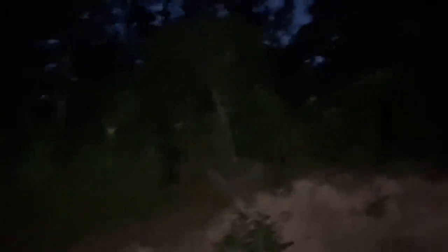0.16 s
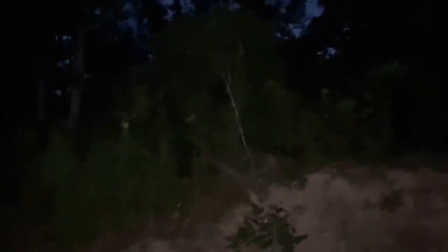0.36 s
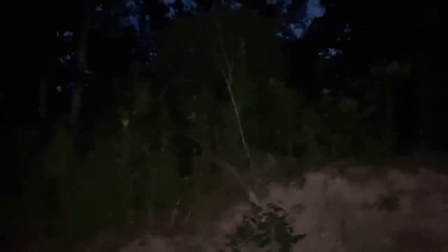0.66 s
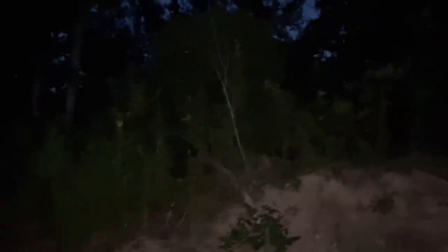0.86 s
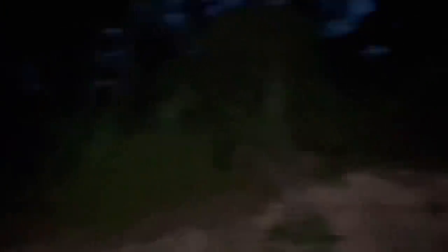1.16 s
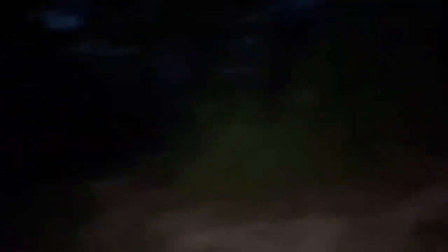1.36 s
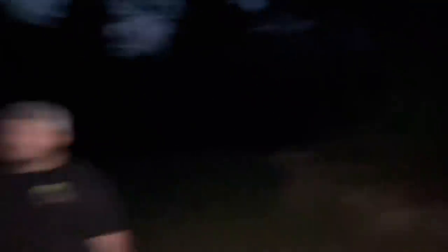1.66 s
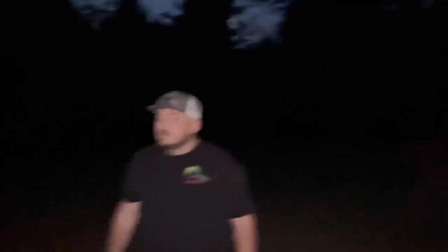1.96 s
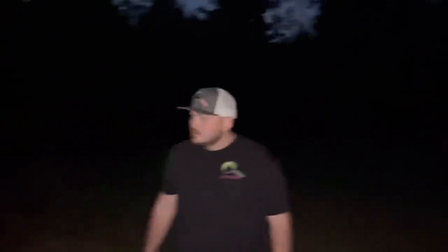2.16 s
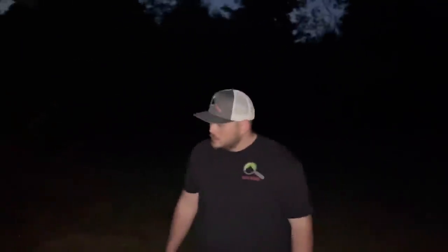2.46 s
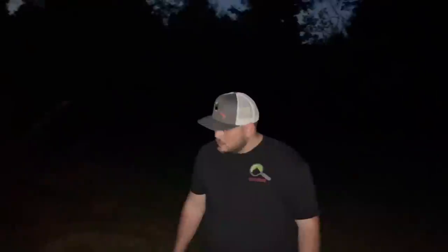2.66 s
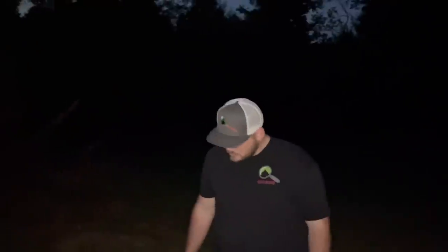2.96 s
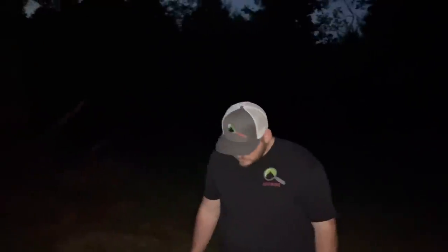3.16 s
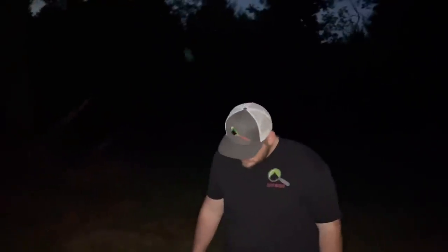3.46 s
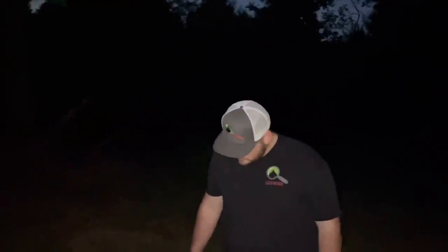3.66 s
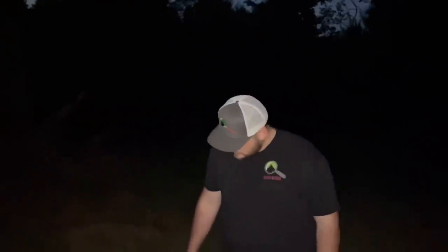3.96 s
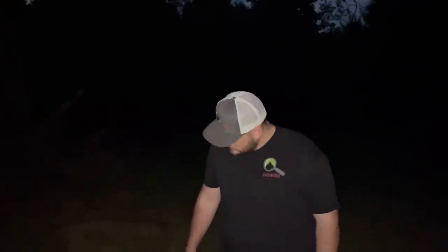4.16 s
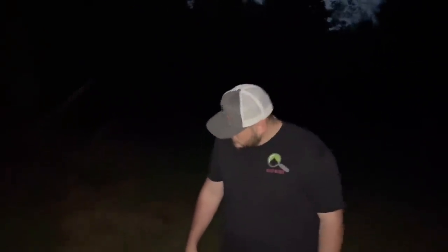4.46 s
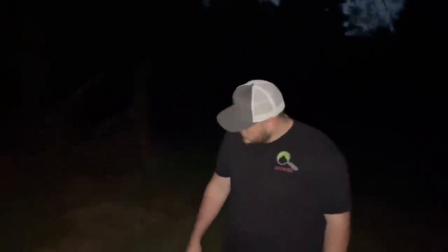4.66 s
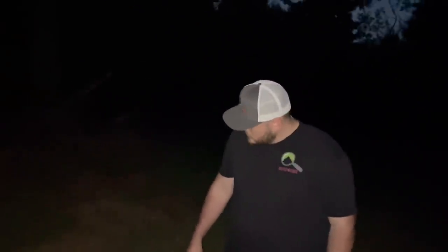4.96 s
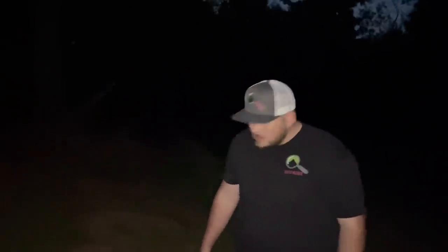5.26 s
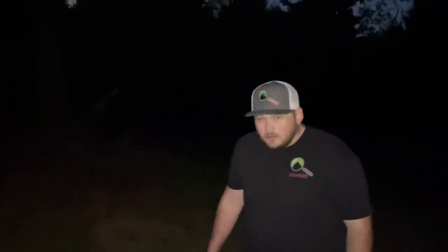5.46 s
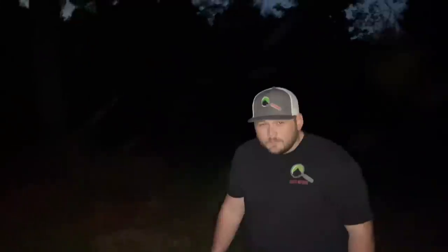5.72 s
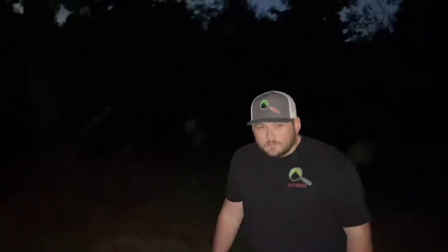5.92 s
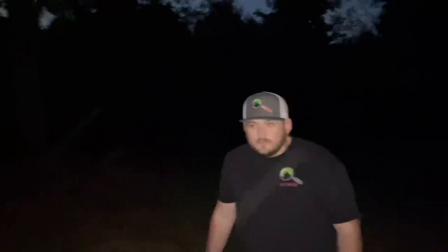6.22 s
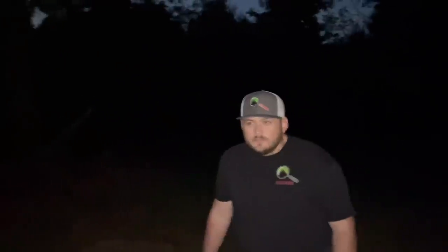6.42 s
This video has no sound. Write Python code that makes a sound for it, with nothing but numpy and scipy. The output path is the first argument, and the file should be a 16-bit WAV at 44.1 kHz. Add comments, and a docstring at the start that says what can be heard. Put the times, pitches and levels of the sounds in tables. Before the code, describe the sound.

A very high, close katydid buzz runs unbroken over cricket trills, chirps and a faint low rumble, with one clear twig tick near two seconds.

```python
"""Night at the edge of a wood. All through, a katydid buzzes very high and close by: two falling scrapes per wing stroke.
Steady crickets, blurred cricket choirs, a far rasp of filtered noise and a low noise rumble lie under it.
Leaves rustle and twigs tick faintly at the start; within half a second nearer crickets begin to trill, then chirp.
Around 1.5 s a dip climbs through the pitches of the buzz and its tone changes; just before 1.9 s a twig ticks clearly.
Trills and chirps go on to the end, with a few fainter ticks (short falling tones) and rustles (bursts of noise)."""
import sys
import numpy as np
from scipy import signal
from scipy.fft import rfft, irfft, next_fast_len
from scipy.io import wavfile
from scipy.ndimage import uniform_filter1d

SR = 44100
rng = np.random.default_rng(int(sys.argv[2]) if len(sys.argv) > 2 else 0)


def dump(signal):
    """Clip the signal to [-1, 1] and save it as 16-bit WAV at the path in sys.argv[1]."""
    limited = np.clip(np.atleast_2d(signal).T, -1, 1)
    pcm = np.round(limited * 32767).astype(np.int16)
    wavfile.write(sys.argv[1], SR, pcm)


N = 290619
T = np.arange(N) / SR  # time of every sample, in seconds


def undb(db):
    """Turn decibels into a gain."""
    return 10 ** (np.asarray(db) / 20)


def unit(x):
    """Scale to an average strength (rms) of 1."""
    return x / np.sqrt(np.mean(x ** 2) + 1e-20)


def steady(x, size=4410):
    """Hold the rms near 1 over every tenth of a second."""
    return x / np.sqrt(np.maximum(uniform_filter1d(x ** 2, size), 1e-12))


def curve(rows):
    """Join (time [s], value) rows by straight lines."""
    return np.interp(T, *np.transpose(rows))


def bout(start, length, attack_s, release_s):
    """A loudness outline that rises, holds and falls within its length."""
    rise = (T - start) / attack_s
    fall = (start + length - T) / release_s
    return np.clip(np.minimum(rise, fall), 0, 1)


def walk(rate):
    """A random curve with a spread near 1, heading for a new value `rate` times a second."""
    steps = rng.standard_normal(2048)
    return np.interp(T * rate, np.arange(len(steps)), steps)


def pan(db):
    """Left and right gains for a level difference; positive is louder on the left."""
    return undb(np.array([[db], [-db]]) / 2)


def colour(x, points):
    """Shape the tone by a (frequency [Hz], level [dB]) spectrum; rms 1."""
    hz, db = np.transpose(points)
    size = next_fast_len(N + 4096)
    f = np.maximum(np.fft.rfftfreq(size, 1 / SR), 1)
    gain = undb(np.interp(np.log(f), np.log(hz), db, left=-90, right=-90))
    return unit(irfft(rfft(x, size) * gain, size)[..., :N])


def band(x, hz, width_hz):
    """Keep a soft-edged band of pitches around hz; rms 1."""
    edges = np.clip([hz - width_hz / 2, hz + width_hz / 2], 20, SR / 2 - 100)
    band_filter = signal.butter(2, edges, "band", fs=SR, output="sos")
    return unit(signal.sosfilt(band_filter, x))


def stereo_noise(side_db):
    """Noise shared by both ears plus a part that is opposite in the two."""
    mid, side = rng.standard_normal((2, N))
    return mid + undb(side_db) * side * np.array([[1], [-1]])


def scatter(x, t60, channels=2, count=5):
    """Countless small echoes from leaves and trunks, fading 60 dB in t60 s, through `count` patterns in turn; rms 1."""
    t = T[:SR // 2]
    out = 0
    for k in range(count):
        echoes = rng.standard_normal((channels, len(t))) * undb(-60 * t / t60)
        distance = np.abs(T / T[-1] * (count - 1) - k)
        share = np.cos(np.pi / 2 * np.minimum(distance, 1))  # fade from one pattern to the next
        out = out + share * signal.fftconvolve(np.atleast_2d(x), echoes, axes=1)[:, :N]
    return unit(out)


def background(flutter_db=1.7):
    """Low rumble, nearly alike in both ears, brighter and wider as it swells, and the soft hush of the wood."""
    # distant rumble: (time [s], level [dB])
    rumble_level = [(0, -58), (.15, -59), (.4, -61), (.8, -58), (1.21, -62), (1.3, -57), (2.04, -63),
                    (2.24, -56), (2.6, -62), (2.84, -57), (3.3, -61.5), (4.15, -62), (4.6, -58.5),
                    (5, -59.5), (5.6, -59.5), (5.78, -65), (6.28, -57.5), (6.59, -59)]
    # tone of the rumble, of its upper part and of the hush: (frequency [Hz], level [dB])
    rumble_colour = [(18, -21), (27, -28), (36, -9.5), (50, -5.5), (70, -1), (97, 1.5), (125, -3.5),
                     (170, -12.5), (260, -43.5), (400, -44)]
    surge_colour = [(110, -18), (170, -0.5), (228, 0.5), (280, -6.5), (400, -12), (600, -23), (900, -56)]
    air_colour = [(250, -3.5), (500, 3.5), (800, 0), (1100, -0.5), (1700, -0.5), (2700, 7), (3200, -9),
                  (5500, -4.5), (6500, -35), (7300, -100), (10000, -44)]
    # hush of the wood: (time [s], level [dB])
    hush_level = [(0, -70), (1.1, -72.5), (2.4, -70.5), (3.7, -71), (5.3, -69.5), (6.59, -69)]
    surge_db, surge_swing = -70, 1.57  # middle level [dB]; dB gained for each dB of rumble

    level_db = curve(rumble_level)
    rumble = colour(stereo_noise(-13.5), rumble_colour) * undb(level_db) * pan(2.6)
    surge_level_db = surge_db + surge_swing * (level_db - level_db.mean())
    surge = colour(stereo_noise(-9.0), surge_colour) * undb(surge_level_db) * pan(2.1)
    air_db = curve(hush_level) + flutter_db * walk(22)
    air = colour(stereo_noise(-0.47), air_colour) * undb(air_db) * pan(3.3)
    return rumble + surge + air


def cricket(hz, rate, duty=.6, droop=.035, wander=.004, uneven=.025, flicker_db=2.0, start=None, arch=0, stroke_db=0):
    """A nearly pure wing tone on each closing stroke, arching and sagging in pitch; a stroke begins at start."""
    turns = np.cumsum(rate * (1 + uneven * walk(6))) / SR  # wing strokes so far
    turns = turns - (rng.random() if start is None else np.interp(start, T, turns))
    u = np.minimum(turns % 1 / duty, 1)  # progress through the sounding part
    stroke_number = np.floor(turns).astype(int) % 1024
    force_db = stroke_db * rng.standard_normal(1024)[stroke_number]  # strokes differ in strength
    pitch = hz * (1 + droop * (.5 - u) + arch * (1 / 8 - (2 * u - 1) ** 2) + wander * walk(45))
    loudness = np.sin(np.pi * u) * undb(force_db + flicker_db * walk(12))
    return unit(loudness * np.sin(2 * np.pi * np.cumsum(pitch) / SR))


def droners(pan_db=2):
    """A few far crickets sing without a break: wing tones repeated at a nearly even pace."""
    # (tone [Hz], pace [strokes/s], sounding share of each stroke [0-1], pitch wander [share], level [dB])
    singers = [(2195, 56.4, .35, .0004, -78.5), (2499, 38.4, .55, .007, -74), (5614, 30, .65, .004, -76),
               (6335, 13.5, .4, .008, -80.5)]
    voices = 0
    for hz, rate, duty, wander, db in singers:
        voice = cricket(hz, rate, duty, droop=0, wander=wander, uneven=0.0072)
        voices = voices + undb(db) * voice
    return voices * pan(pan_db)


def choirs(count=4, blur_width=1.48, side_db=-2, swell_db=1.5):
    """In each choir a few crickets stand out, apart in pitch and pace; the many behind them blur into one band."""
    # (middle tone [Hz], spread [Hz], middle pace [pulses/s], level [dB], left minus right [dB])
    groups = [(1936, 120, 48, -76, 1), (2253, 80, 44, -73.5, 3), (2457, 125, 44, -65.5, 2),
              (2764, 90, 38, -77, 3), (4232, 180, 36, -60, 5), (4840, 45, 49, -75.5, 2),
              (5250, 160, 46, -60.5, 7.5), (5910, 130, 36, -73.5, 2), (6300, 120, 12, -76.5, -4.5)]
    out = 0
    for hz, spread_hz, rate, db, pan_db in groups:
        voices = 0
        for place in np.linspace(-1, 1, count):
            voice = cricket(hz + place * spread_hz, rate * (1 + .2 * place),
                            duty=.55, droop=.03, wander=.01, uneven=.06, stroke_db=1.5)
            lag = int(round(place * SR / hz / 4))  # those off to one side reach one ear first
            voices = voices + undb(-4 * place ** 2) * np.array([voice, np.roll(voice, lag)])
        blur = band(stereo_noise(side_db), hz, blur_width * spread_hz)
        level = undb(db + swell_db * walk(5))
        out = out + unit(unit(voices) + blur) * level * pan(pan_db)
    return out


def far_insects(flutter_db=2):
    """A far insect rasps in bouts; distance blurs the rasp into a fluttering, wide hiss."""
    # (start [s], length to the middle of the fade-out [s], level [dB])
    rasps = [(-.02, 0.46, -74.5), (0.436, 0.59, -69.5), (1.1, 0.99, -76), (2.38, 0.48, -70),
             (3.995, 0.33, -71), (4.34, 0.54, -72), (4.978, 0.23, -77), (5.61, 0.52, -72),
             (6.222, 0.58, -75)]
    attack_s, release_s = 0.066, 0.33
    rest_db = -82.5  # others, further off, go on between the bouts
    rasps_per_s, swing_db = 6.6, 2.5

    bouts = undb(rest_db)
    for start, length, db in rasps:
        # each bout is a few separate rasps
        beats_db = -swing_db * np.cos(2 * np.pi * rasps_per_s * (T - start))
        bouts = bouts + undb(db + beats_db) * bout(start, length + release_s / 2, attack_s, release_s)
    hiss = band(stereo_noise(-0.37), 3270, 1100)
    return hiss * bouts * undb(flutter_db * walk(60)) * pan(0.85)


def trills(pan_db=6):
    """Nearer crickets to the left sing fast trills and slower chirps; echoes run their uneven pulses together."""
    # fast trills: (start [s], length [s], tone [Hz], level [dB], pitch wander [share])
    trill_table = [(0.47, 0.395, 4300, -59, .003), (1.0, .32, 4800, -74, .01),
                   (1.235, 0.39, 4290, -58.7, .004), (1.24, 0.33, 4440, -66.5, .006),
                   (1.78, 0.33, 4440, -66, .007), (2.056, 0.28, 4530, -64.5, .005),
                   (2.4, 0.28, 4590, -69, .007), (2.42, .3, 4800, -75, .01), (2.68, .33, 4440, -68, .009),
                   (3.62, 0.38, 4295, -61, .004), (3.64, .25, 4800, -73, .01), (3.92, 0.6, 4380, -64, .01),
                   (4.1, .3, 4580, -68, .008), (5.25, 0.33, 4530, -66, .008),
                   (5.665, 0.22, 4286, -58.5, .004), (5.83, .18, 4270, -63, .004),
                   (5.84, .3, 4800, -72.5, .01), (6.22, 0.32, 4270, -62.5, .005),
                   (6.26, .3, 4580, -69, .005)]
    # higher, slower chirps: (start [s], length [s], tone [Hz], level [dB])
    chirp_table = [(.63, .11, 5300, -63), (.96, .15, 5330, -63), (1.83, .24, 5310, -63.5),
                   (2.09, .27, 5400, -58.5), (2.12, .27, 5230, -64), (2.71, .28, 5400, -62),
                   (3.1, .22, 5290, -64.5), (3.35, .29, 5400, -62.5), (3.66, .2, 5260, -66),
                   (3.96, .34, 5390, -62), (4.27, .2, 5280, -63.5), (4.59, .23, 5400, -61.5),
                   (5.17, .29, 5350, -60.5), (5.67, .24, 5250, -62), (5.79, .13, 5390, -61),
                   (6.18, .2, 5310, -61.5)]
    fade_s, echo_db = 0.035, -7
    droop, stroke_db = .014, 1.7  # pitch sag [share], scatter of the strokes [dB]

    out = 0
    for start, length, hz, db, wander in trill_table:
        voice = cricket(hz, rate=41, duty=.82, droop=droop, wander=wander, uneven=.012,
                        flicker_db=0.0, start=start, stroke_db=stroke_db)
        out = out + undb(db) * bout(start, length, fade_s, fade_s) * voice
    for start, length, hz, db in chirp_table:
        voice = cricket(hz, rate=24.5, duty=.8, droop=droop, wander=.005, uneven=.03,
                        flicker_db=.5, start=start, arch=.035, stroke_db=stroke_db)
        out = out + undb(db) * bout(start, length, fade_s, fade_s) * voice
    echo = undb(echo_db) * np.std(out) * scatter(out, t60=.25, count=1)
    return (out + echo) * pan(pan_db)


def ground(tail_db=-11):
    """Twigs tick with a quick fall in pitch, as fast bending waves arrive first; leaves crackle in patches."""
    # twig ticks and knocks:
    # (start [s], peak level [dB], middle pitch [Hz], length [s], fall of pitch [natural-log units])
    twig_table = [(0.036, -54, 1320, 0.0038, 2.3), (0.044, -52, 1070, 0.003, 2.3),
                  (0.053, -56, 1600, 0.0028, 2), (1.8702, -38.3, 1100, 0.0052, 2.0),
                  (1.875, -50, 300, .006, 1.2), (1.8955, -49, 1044, 0.0045, 1.3),
                  (1.958, -53, 1600, 0.003, 1.4), (1.995, -57, 1100, 0.003, 1.8),
                  (2.035, -57, 800, 0.003, 1.9), (2.126, -55, 970, 0.0026, 2.5),
                  (3.8902, -54.5, 1910, 0.0042, 1.9), (4.764, -51.5, 680, 0.0054, 1.64),
                  (5.9127, -53, 1400, 0.004, 1.1), (5.916, -53, 150, 0.015, 1.1),
                  (6.031, -53.5, 760, 0.0033, 0.8)]
    # leaf rustles and cracks: (middle time [s], half length [s], centre frequency [Hz], level [dB])
    leaf_table = [(0.059, 0.026, 1450, -60), (0.06, 0.032, 3300, -61.5), (0.232, 0.02, 5740, -56.5),
                  (0.254, 0.02, 3500, -65), (1.871, .0015, 3600, -53), (1.878, .007, 1300, -59),
                  (1.993, 0.19, 990, -69), (3.893, 0.007, 5770, -60.5), (4.069, 0.004, 5640, -56),
                  (4.663, 0.27, 940, -71), (4.82, 0.014, 6000, -64), (4.87, .01, 6500, -65),
                  (5.92, 0.025, 1000, -71), (6.045, 0.025, 750, -70)]

    ticks = 0
    for start, db, hz, length, fall in twig_table:
        u = np.clip((T - start) / length, 0, 1)  # progress through the tick
        cycles = np.cumsum(hz * np.exp(fall * (.45 - u)) * (u > 0)) / SR
        loudness = np.minimum(5 * u, 1) * (1 - u ** 2)
        ticks = ticks + undb(db) * loudness * np.sin(2 * np.pi * cycles)
    echo = undb(tail_db) * np.std(ticks) * scatter(ticks, t60=0.17, count=1)

    # the noise jumps in level every 64 samples, about 1.5 ms
    patches = np.repeat(rng.standard_normal(N // 64 + 1), 64)[:N]
    crackle = stereo_noise(-1.8) * undb(4.5 * patches)
    leaves = 0
    for middle, half, hz, db in leaf_table:
        swell = np.exp(-((T - middle) / half) ** 2)
        leaves = leaves + band(crackle, hz, 1.09 * hz) * undb(db) * swell
    return (ticks + echo + leaves) * pan(1.3)


def turning(x, size=512):
    """The buzz starts with a different tone; as that gives way, a dip climbs through its pitches."""
    # tone of the buzz before the change: (frequency [Hz], level [dB])
    early_colour = [(8000, -3), (8800, -5), (9600, -1), (10500, 1), (12000, -1), (12400, 2.5), (13200, 3.5),
                    (13650, -1), (14200, 0), (14750, -1), (15050, -5), (15600, -1)]
    turn_s, turn_length_s = 1.47, .4  # middle and length of the change
    turn_hz, sweep_hz_per_s = 13000, 9500  # the dip's pitch at the middle, and its climb
    dip_db, dip_hz = -6.5, 450  # deepest level, and half width to where 1/e of the dB are left

    hz, t, z = signal.stft(x, SR, nperseg=size)
    early = np.clip((turn_s - t) / turn_length_s + .5, 0, 1)
    early_db = np.interp(hz, *np.transpose(early_colour))[:, None] * early
    centre_hz = turn_hz + sweep_hz_per_s * (t - turn_s)
    notch_db = dip_db * np.exp(-((hz[:, None] - centre_hz) / dip_hz) ** 2)
    notch_db = notch_db * np.exp(-((t - turn_s) / (turn_length_s / 2)) ** 2)  # only around the change
    return signal.istft(z * undb(notch_db + early_db), SR, nperseg=size)[1][..., :N]


def katydid(return_share=.447, jitter_s=.000025, size_db=0.97):
    """Opening and closing wings each scrape the file; the tooth rate falls as the wing slows.
    The low end of each scrape reaches the two ears out of step, so it sounds wide."""
    # loudness of the main buzz: (time [s], level [dB])
    buzz_level = [(0.02, -47), (0.22, -44), (1.04, -44.5), (1.38, -41.7), (1.54, -45.3), (1.68, -42),
                  (2.7, -43), (3.42, -44.3), (4.15, -43.2), (5.06, -45.2), (5.95, -44.7), (6.55, -43.2)]
    # wing speed: (time [s], pace [strokes/s])
    stroke_pace = [(0, 62.1), (2.2, 62.05), (2.7, 62.25), (3.2, 61.9), (3.6, 62.5), (4.7, 62.5),
                   (4.95, 62.15), (5.4, 62.4), (6.59, 62.1)]
    # tone of the main buzz, and of the part that differs between the ears: (frequency [Hz], level [dB])
    wing_colour = [(8000, -60), (9200, -46), (9650, -31), (10100, -27), (10500, -17), (11300, -13.5),
                   (11800, -18.5), (12300, -7), (12800, -3.5), (13030, -4.5), (13450, .5), (13980, -3.5),
                   (14550, 1), (15000, -4), (15350, -11.5), (15700, -11), (15900, -18)]
    wide_colour = [(7000, -22), (8000, -9), (8350, -6), (8600, .5), (8900, 1.5), (9250, -3), (9500, -2),
                   (10000, -7), (10450, -4.5), (11200, -2.5), (11750, -8), (12150, -2), (12600, -.5),
                   (13000, -4), (13700, -18), (15000, -32)]
    scrape_s, start_hz, end_hz = .0046, 16600, 7400  # length of a scrape; its first and last tooth rate
    near_echo_db, wide_db, wide_echo_db = -3.2, -55.5, -1

    # two scrapes to each stroke, the second return_share of the way through
    turns = np.cumsum(curve(stroke_pace)) / SR
    strokes = np.arange(int(turns[-1]) + 1)
    scrape_turns = (strokes[:, None] + [0, return_share]).ravel()
    starts = np.interp(scrape_turns, turns, T) + 0.0035

    # each scrape differs a little in timing, strength and pitch
    late, size, bend = rng.standard_normal((len(starts), 3)).T
    k = np.maximum(np.searchsorted(starts, T + scrape_s / 4) - 1, 0)  # which scrape is sounding
    u = np.clip((T - starts[k] - jitter_s * late[k]) / scrape_s, 0, 1)  # progress along the file
    sweep = start_hz * u + (end_hz - start_hz) * u ** 2 / 2
    teeth = scrape_s * (sweep + 150 * bend[k] * (u - .5))  # teeth passed so far
    pressure = np.minimum(6 * np.sin(np.pi * u), 1) * undb(size_db * size[k])

    song = colour(pressure * np.sin(2 * np.pi * teeth), wing_colour)
    song = song + undb(near_echo_db) * scatter(song, t60=0.2, channels=1, count=12)
    main = steady(turning(song)) * undb(curve(buzz_level))

    wide = colour(pressure * np.cos(2 * np.pi * teeth), wide_colour)
    wide = unit(wide + undb(wide_echo_db) * scatter(wide, t60=0.33, channels=1, count=12))
    opposite = undb(wide_db) * turning(wide) * np.array([[1], [-1]])
    return main + opposite


def scene():
    """Everything that sounds at the edge of the wood."""
    far = background() + droners() + choirs() + far_insects()
    near = trills() + ground() + katydid()
    return far + near


def record(dry):
    """Cut the very top, above 15780 Hz, with a steep low-pass filter."""
    top_cut = signal.ellip(12, .1, 80, 15780, fs=SR, output="sos")
    return signal.sosfilt(top_cut, dry)


dry = scene()
out = record(dry)
dump(out)
```